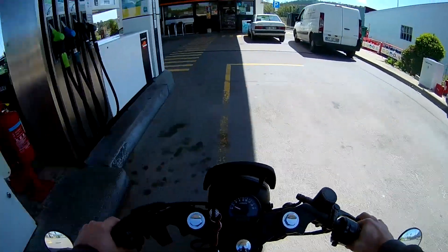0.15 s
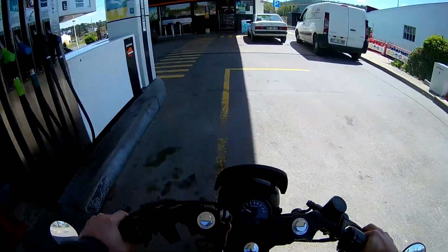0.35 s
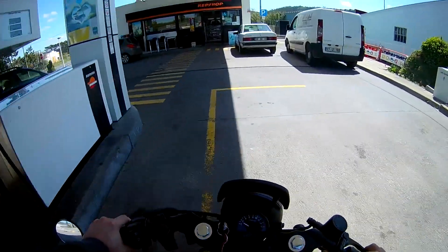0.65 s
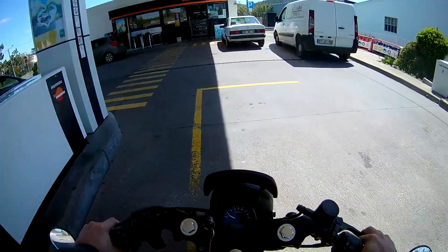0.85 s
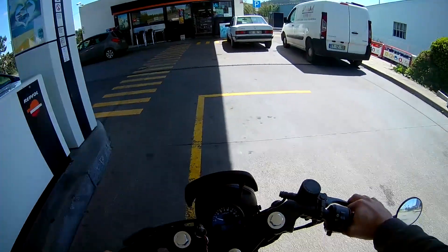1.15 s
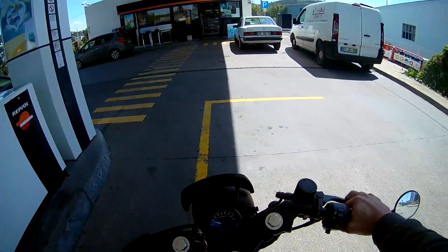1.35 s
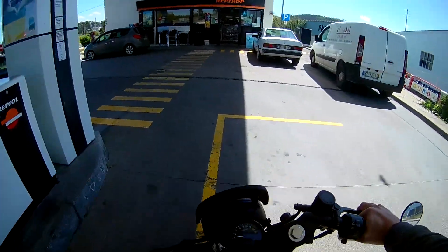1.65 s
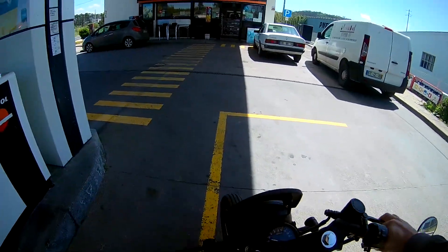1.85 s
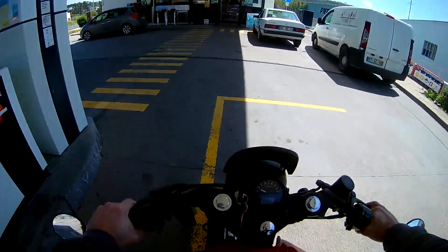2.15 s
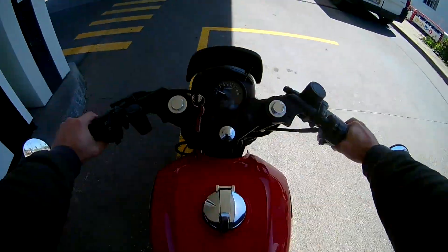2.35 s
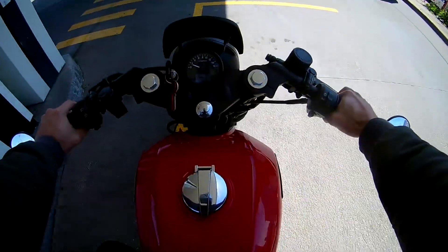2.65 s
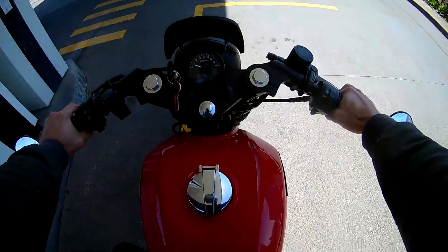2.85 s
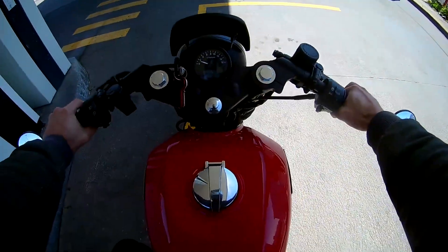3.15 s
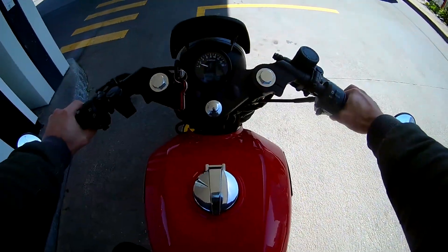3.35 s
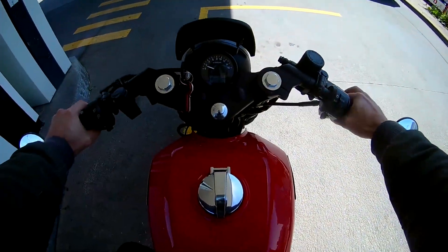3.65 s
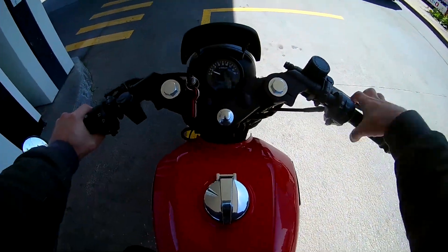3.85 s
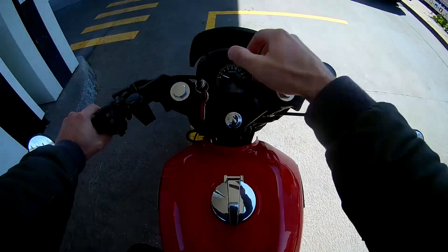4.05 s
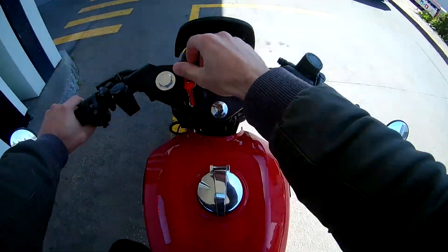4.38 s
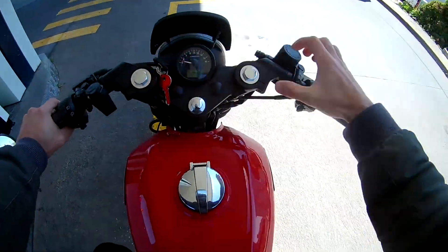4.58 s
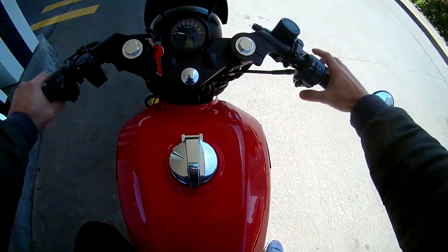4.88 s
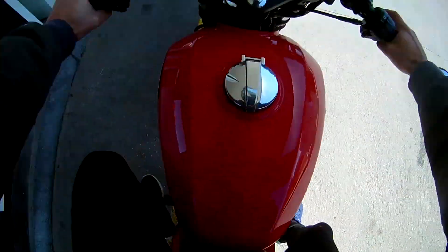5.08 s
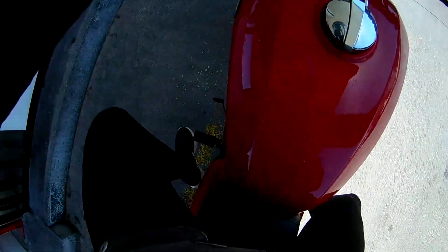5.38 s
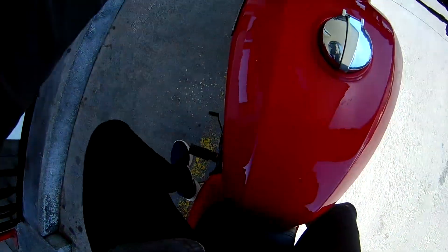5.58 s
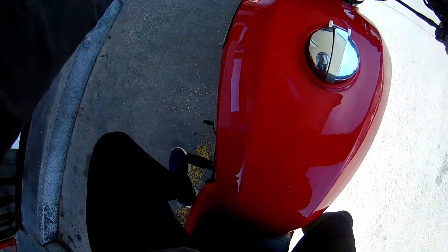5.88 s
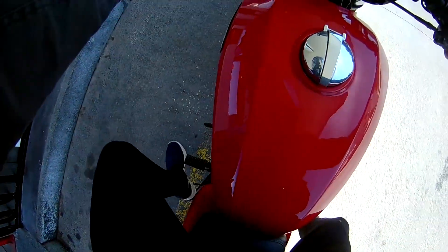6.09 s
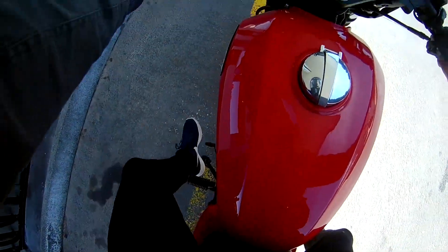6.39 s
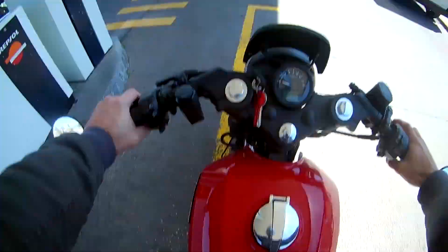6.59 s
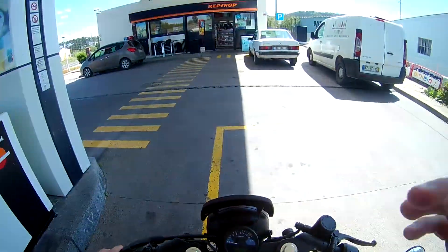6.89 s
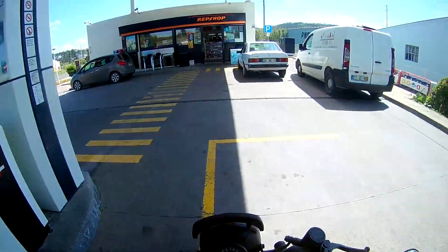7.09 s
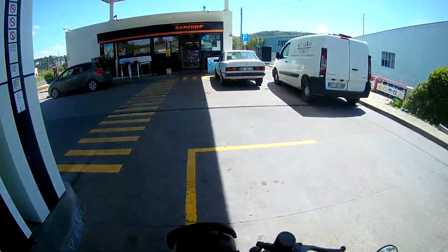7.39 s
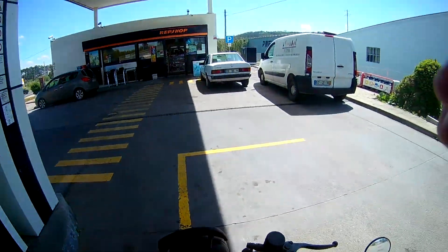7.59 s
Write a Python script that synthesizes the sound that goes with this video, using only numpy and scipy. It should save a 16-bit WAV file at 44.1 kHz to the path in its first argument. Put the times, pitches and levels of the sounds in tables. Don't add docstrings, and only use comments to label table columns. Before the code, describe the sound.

A low, dull motorcycle idle of about thirteen beats a second, with stumbles, sits close to the boxed-in microphone with hollow outdoor traffic behind it. Small metal ticks accompany switching off. Then the case itself takes over: overloaded plastic cracks, dry clatter, stick-slip scraping and little spring chirps, followed by low buffeting, more bumps and a rough fabric rub that stops with the hand letting go.

```python
import sys
import numpy as np
from scipy import signal
from scipy.io import wavfile
from scipy.ndimage import uniform_filter1d

SR = 44100
rng = np.random.default_rng(int(sys.argv[2]) if len(sys.argv) > 2 else 0)


def invert_db(x):
    u = np.asarray(x, float) / 20
    return 10 ** u


def file_out(sig):
    cols = np.atleast_2d(sig).T
    lim = np.clip(cols, -1, 1)
    pcm = np.round(lim * 32767).astype(np.int16)
    wavfile.write(sys.argv[1], SR, pcm)


N = 340893


def evened(x):
    return x / np.sqrt(np.mean(x ** 2) + 1e-20)


def curve(rows, t):
    s, *columns = np.transpose(rows)
    return [np.interp(t, s, c) for c in columns]


def add(mix, s, sound):
    part = mix[max(round(s * SR), 0):][:len(sound)]
    part += sound[:len(part)]


def decay(length, time_constant_s):
    return np.exp(-np.arange(length) / SR / time_constant_s)


def band(x, low_hz, high_hz):
    return signal.sosfilt(signal.butter(4, [low_hz, high_hz], "bandpass", fs=SR, output="sos"), x)


def ring(modes, length_s, factor=1.0, shake_db=0., phase=0., rise_s=0.00029):
    t = np.arange(round(length_s * SR)) / SR
    hz, db, t60_s = np.transpose(modes)[:, :, None]
    waves = np.sin(2 * np.pi * hz * t + np.reshape(phase, (-1, 1)))
    level_db = db + np.reshape(shake_db, (-1, 1)) - 60 * t / (t60_s * factor)
    rise = (1 - np.exp(-t / rise_s)) ** 2
    return rise * (invert_db(level_db) * waves).sum(0)


def noise(spectrum, patchy_db, size=1024):
    frames, hz = 4 * N // size + 5, np.fft.rfftfreq(size, 1 / SR)
    a, b, patches = rng.standard_normal((frames, len(hz), 3)).T
    patches = uniform_filter1d(patches, size=8, axis=0)
    patches = evened(uniform_filter1d(patches, size=10, axis=1))
    f, db = np.transpose(spectrum)
    colour_db = np.interp(np.log(hz + 1), np.log(f + 1), db, left=-120, right=-120)
    z = (a + 1j * b) * invert_db(colour_db[:, None] + patchy_db * patches)
    return evened(signal.istft(z, nperseg=size, noverlap=3 * size // 4)[1][:N])


def resonate(x, hz, width_hz):
    turn = np.exp(2j * np.pi * np.cumsum(hz * np.ones(len(x))) / SR)
    r = np.exp(-np.pi * width_hz / SR)
    return evened((turn * signal.lfilter([1 - r], [1, -r], x / turn)).real)


# pitch_hz, density_db [dB per Hz]
YARD_COLOUR = [(90, -48), (150, -12.5), (260, -7.5), (400, -10.5), (580, -12.5), (850, -11), (1050, -6.5),
               (1280, -8.5), (1460, 0), (1750, -8.5), (2050, -15.5), (2350, -26.5), (2900, -32),
               (3600, -27), (4300, -33), (4900, -44), (6500, -48)]
# time_s, level_db
TRAFFIC_LEVEL = [(0.0, -50), (0.99, -48.5), (1.57, -49.5), (2.97, -47), (3.98, -48), (4.65, -51.5),
                 (4.89, -49.5), (5.7, -48.5), (6.42, -50.5), (7.15, -53.5), (7.49, -53.5), (7.73, -38)]
ENGINE_OFF_S, LOW_ON_DB, LOW_OFF_DB = 4.67, 2, -1.5


def yard():
    t = np.arange(N) / SR
    wash = noise(YARD_COLOUR, patchy_db=.9)
    low = signal.sosfilt(signal.butter(2, 600, fs=SR, output="sos"), wash)
    low_db = np.interp(t - ENGINE_OFF_S, [0, .25], [LOW_ON_DB, LOW_OFF_DB])
    return invert_db(curve(TRAFFIC_LEVEL, t)[0]) * (wash + (invert_db(low_db) - 1) * low)


# pitch_hz, level_db, until_s
PUMP = (868, -65.5, 5.2)


def pump_hum():
    hz, db, until_s = PUMP
    tone = evened(band(rng.standard_normal(N), hz - 4, hz + 4))
    return invert_db(db) * tone * np.clip(until_s - np.arange(N) / SR, 0, 1)


# pitch_hz, density_db [dB per Hz]
HISS_COLOUR = [(2650, -12), (4500, -8.5), (8730, -11.5), (9590, -12), (11600, -13), (15100, -8),
               (15700, -9)]


def hiss():
    return invert_db(-74) * noise(HISS_COLOUR, patchy_db=1.5)


# time_s, level_db
BREEZE = [(0, -50), (1, -49), (2.7, -52), (3.2, -53), (4.1, -52), (4.6, -58), (5.2, -51), (5.85, -56),
          (7.73, -56)]
# peak_s, level_db, rise_s [to rise 20 dB], fall_s [to fall 20 dB]
PUSHES = [(1.38, -41, .15, .1), (1.78, -45, .1, .3), (2.33, -47, .2, .3), (2.52, -45, .2, .1),
          (5.29, -37, .08, .3), (5.42, -29, .22, .08), (5.54, -30, .07, .12), (5.67, -38, .1, .15),
          (6.03, -50, .2, .2), (6.396, -43, .06, .06), (6.62, -46, .04, .1), (6.72, -48, .2, .25),
          (7.142, -28, .055, .09), (7.33, -20.5, .055, .07), (7.392, -19, .065, .095),
          (7.478, -19.5, .055, .32)]
LET_GO_S, LET_GO_DB_PER_S = 7.67, 436


def pushing(t):
    s, db, rise_s, fall_s = np.transpose(PUSHES)[:, :, None]
    shoves_db = db - 20 * np.where(t < s, (s - t) / rise_s, (t - s) / fall_s)
    shove_db = shoves_db.max(0) - LET_GO_DB_PER_S * np.maximum(t - LET_GO_S, 0)
    return np.maximum(curve(BREEZE, t)[0], shove_db)


# pitch_hz, density_db [dB per Hz]
ROCKING_COLOUR = [(12, -30), (20, -14.5), (42, 0.5), (75, -10.5), (113, -14.5), (173, -22.5), (250, -20),
                  (320, -43.5), (550, -120)]
# pitch_hz, density_db [dB per Hz]
SWAY_COLOUR = [(15, -27.5), (30, -16.5), (55, -3), (80, -8), (110, -25.5), (250, -29), (400, -60)]
AIR_TOP_DB = -47


def rumble():
    t = np.arange(N) / SR
    push_db = np.interp(t, t[::64], pushing(t[::64]))
    rocking = noise(ROCKING_COLOUR, patchy_db=3.0, size=4096)
    rocking = rocking / np.sqrt(uniform_filter1d(rocking ** 2, size=30000))
    sway = noise(SWAY_COLOUR, patchy_db=5.0, size=4096)
    sway = sway / np.sqrt(uniform_filter1d(sway ** 2, size=2500))
    excess = np.maximum(invert_db(push_db) - invert_db(AIR_TOP_DB), 0)
    return invert_db(np.minimum(push_db, AIR_TOP_DB)) * rocking + excess * sway


def stick_slip_tones(rows):
    out = np.zeros(N)
    for s, length_s, start_hz, end_hz, db in rows:
        hz = np.linspace(start_hz, end_hz, round(length_s * SR))
        waver = evened(uniform_filter1d(rng.standard_normal(SR), size=300))[:len(hz)]
        phase = 2 * np.pi * np.cumsum(hz * (1 + 0.013 * waver)) / SR
        add(out, s, invert_db(db) * np.sin(phase) * signal.windows.hann(len(hz)))
    return out


# start_s, length_s, start_hz, end_hz, level_db
BRAKE_SQUEAKS = [
    (0.013, 0.108, 607, 703, -46),
    (0.036, 0.051, 740, 760, -49),
    (0.027, .07, 12400, 12450, -71),
    (1.49, .05, 12450, 12400, -74),
]


def brake():
    return stick_slip_tones(BRAKE_SQUEAKS)


# first_beat_s, last_beat_s, first_db, last_db
IDLE_STRETCHES = [(0.074, 0.379, -6.5, -7), (0.535, 0.7607, -9, -6.5), (0.8373, 1.302, -9, -5.5),
                  (1.379, 1.538, -7.5, -7.5), (1.6223, 1.853, -6.5, -9), (2.1013, 2.6447, -5.5, -5.5),
                  (2.723, 2.891, -6.5, -6.5), (3.23, 3.615, -5.5, -6), (3.6996, 4.152, -5.5, -5.5),
                  (4.234, 4.304, -3.5, -8.5)]
BEAT_S = .0775
# time_s, strength_db
LONE_BEATS = [
    (0.45, -16),
    (1.9366, -7),
    (2.0098, -14),
    (2.9663, -28),
    (3.0613, -6.5),
    (3.1404, -11.5),
    (4.413, -14),
    (4.5, -15),
]


def beats():
    rows = list(LONE_BEATS)
    for first_s, last_s, first_db, last_db in IDLE_STRETCHES:
        count = round((last_s - first_s) / BEAT_S) + 1
        rows += zip(np.linspace(first_s, last_s, count), np.linspace(first_db, last_db, count))
    return sorted(rows)


# pitch_hz, level_db, t60_s
PIPE_MODES = [(64.6, -5.5, 0.4), (95.7, 8, 0.15), (177, -3.5, 0.12), (289.5, -1, 0.14), (311.9, 6.5, 0.11),
              (402, -2.5, 0.076), (453.4, 1, 0.075), (520, -10, 0.04)]
PIPE_DB, ECHO_S, ECHO_DB = -40, 0.022, -7.5


def engine():
    out, firings = np.zeros(N), beats()
    start_phase = np.pi / 2 - .0021 * 2 * np.pi * np.array(PIPE_MODES)[:, 0]
    chance = rng.standard_normal((len(firings), len(PIPE_MODES)))
    for (s, db), shake in zip(firings, chance):
        phase = start_phase + 0.47 * shake[::-1]
        beat = ring(PIPE_MODES, 0.27, shake_db=1.8 * shake, phase=phase, rise_s=0.0016)
        add(out, s, invert_db(PIPE_DB + db) * beat)
        add(out, s + ECHO_S, -invert_db(PIPE_DB + db + ECHO_DB) * beat)
    return out


# time_s, peak_db, pitch_hz, width_octaves
METAL_TICKS = [(.5217, -54, 3480, 0.45), (.8565, -56, 3830, .4), (.8789, -53, 3400, 0.63),
               (.9294, -55, 3670, .5), (1.058, -55, 3700, 0.53), (1.314, -47, 2400, 1.65),
               (1.9494, -54, 3620, 0.83), (2.488, -47, 1900, 2.2), (3.02, -47, 3700, 0.54),
               (3.029, -47.5, 3700, 0.68), (4.361, -41.5, 4100, 1), (4.9247, -48, 3930, 0.47),
               (4.9694, -55, 3620, .4), (4.9895, -53, 3600, 0.39), (5.0594, -60, 3900, .5),
               (5.2006, -61, 4000, .7), (5.2444, -47, 4280, 0.78), (5.488, -44, 1520, .6),
               (6.309, -55.5, 3830, 0.48), (6.362, -55, 3950, .7)]


def ticks():
    out, chance = np.zeros(N), rng.standard_normal((len(METAL_TICKS), 900))
    for (s, db, hz, octaves), grit in zip(METAL_TICKS, chance):
        touches = grit * abs(grit) * decay(len(grit), 0.0067)
        jingle = band(touches, hz * 2 ** (-octaves / 2), hz * 2 ** (octaves / 2))
        add(out, s, invert_db(db) * jingle / abs(jingle).max())
    return out


# time_s, loss_db
LATCH_CHOKES = [
    (5.2933, 15.5),
    (5.2999, 15),
    (5.524, 7.5),
    (5.5335, 5.5),
]
CHOKE_S = .002


def choked(s, sound):
    t = s + np.arange(len(sound)) / SR
    loss_db = sum(db * np.clip((t - at) / CHOKE_S, 0, 1) for at, db in LATCH_CHOKES if at > s)
    return sound * invert_db(-loss_db)


HAND_ON_S, HAND_EDGE_HZ, HAND_LOSS_DB, DEAD_HZ = 7.0, 4450, -19, 5050


def through_case(body, treble):
    lid = band(band(treble, 2500, 7300), 2000, 7500)
    lid = signal.lfilter(*signal.iirnotch(DEAD_HZ, 9, SR), lid)
    below_edge = band(band(lid, 3100, HAND_EDGE_HZ), 2000, HAND_EDGE_HZ)
    held = invert_db(HAND_LOSS_DB) * lid + below_edge
    return band(body, 550, 2200) + np.where(np.arange(N) < HAND_ON_S * SR, lid, held)


# pitch_hz, level_db, t60_s
CASE_MODES = [(806, -17, 0.05), (934, -8, 0.017), (1108, -13, 0.046), (1294, -9.5, 0.036),
              (1402.5, -3, 0.029), (1605, -10, 0.04), (1869, -10, 0.042), (1909, -30.5, .035),
              (2912, 3.5, 0.05), (3400, -21, 0.045), (4280, 5, 0.026), (3975, -1.5, 0.051),
              (4680, -3, 0.026), (5620, -8, 0.045), (6135, -9, 0.025), (7040, -9.5, 0.016)]
WALL_MODES = [m for m in CASE_MODES if m[0] < 2400]
LID_MODES = [m for m in CASE_MODES if m[0] >= 2400]
# time_s, peak_db, treble_db, strongest_hz, ring_factor
HARD_BLOWS = [(5.2849, 19.5, -15.5, 1410, 0.77), (5.2956, 15.5, -18.5, 1410, 0.7),
              (5.3035, -10, -7, 1400, 0.54), (5.3065, -4.5, -12.5, 1400, 0.61),
              (5.312, -8, -25, 1526, 0.81), (5.32, -6, -48.5, 1270, 0.53), (5.5153, 22.5, -20, 1407, 0.73),
              (5.5284, -8, -9, 1474, 0.4), (5.643, -14, -20, 1305, 0.59), (5.982, -26, -13, 1850, 0.34),
              (6.067, -23.5, -22.5, 1430, 0.33), (6.124, -27, -19, 1420, 0.6), (7.311, -22, -4, 1590, 0.53),
              (7.3875, -11, -19, 1120, 0.2), (7.458, -14.5, -19.5, 1080, 0.49),
              (7.4714, -6.5, -42, 980, 0.49)]
# time_s, peak_db, treble_db, strongest_hz
LATCH_RATTLES = [(1.313, -47, -30, 1600), (3.029, -44, -30, 1600), (4.925, -33, -30, 1600),
                 (4.99, -36, -30, 1650), (5.378, -30, -10, 1630), (5.489, -45, -30, 1480),
                 (5.5332, -15, -27.5, 1640), (5.829, -35, -28.5, 1470), (5.843, -38, -19.5, 1450),
                 (5.862, -30, -25, 1450), (5.964, -35, -16, 1490), (5.672, -34, -39, 1940),
                 (5.685, -38, -27, 1500), (5.708, -29, -22, 1480), (5.715, -24, -22, 1440),
                 (5.727, -20.5, -16, 1430), (5.734, -17, -37, 1480), (5.748, -20, -28, 1640),
                 (5.761, -27, -24, 1520), (5.768, -29, -21, 1480), (5.853, -33.5, -24, 1430),
                 (5.927, -27, -17, 1630), (5.938, -33, -15, 1354), (5.951, -40, -12, 1430),
                 (6.007, -37.5, -18, 1920), (6.025, -34.5, -24, 1560), (6.13, -29.5, -18.5, 1420),
                 (6.141, -38, -17, 1395), (6.3635, -34, -24.5, 1420), (7.119, -35, -14, 1576),
                 (7.287, -33, -19, 1670), (7.351, -23, -17, 1940), (7.378, -35, -12, 1940),
                 (7.41, -30, -22, 1620), (7.4968, -22, -20, 1600), (7.52, -18, -20, 1900)]
RATTLE_RING, CONTACT_S, TOP_DB = .7, .0009, 22


def knocks():
    body, treble = np.zeros((2, N))
    hits = sorted(HARD_BLOWS + [(*row, RATTLE_RING) for row in LATCH_RATTLES])
    chance = rng.standard_normal((len(hits), len(CASE_MODES) + 600))
    wall_hz = np.array(WALL_MODES)[:, 0]
    for (s, db, treble_db, hz, factor), luck in zip(hits, chance):
        shake_wall, shake_lid, grit = np.split(luck, [len(WALL_MODES), len(CASE_MODES)])
        spot_db = 9 * np.exp(-(np.log2(wall_hz / hz) / .12) ** 2) + 1.5 * shake_wall
        db = min(db, TOP_DB)
        contact = grit * decay(len(grit), CONTACT_S)
        wall = np.convolve(ring(WALL_MODES, .12, factor, spot_db), np.r_[1, .12 * contact])
        lid = np.convolve(ring(LID_MODES, .08, .5 * factor, 1.5 * shake_lid), np.r_[2, contact])
        add(body, s, choked(s, invert_db(db) * wall / abs(wall).max()))
        add(treble, s, choked(s, invert_db(db + treble_db + 4.5) * lid / abs(lid).max()))
    return through_case(body, treble)


# pitch_factor, level_db
MOUNT_MODES = [(.5, -2), (0.999, 3), (1.6, -5), (2.9, -4.5)]
# time_s, peak_db, pitch_hz, t60_s
BUMPS = [(2.488, -29, 310, 0.027), (2.972, -43, 190, .08), (5.06, -37, 357, 0.031),
         (5.108, -34.5, 318, 0.014), (5.146, -36.5, 302, 0.019), (5.199, -33.5, 310, 0.021),
         (5.245, -32.5, 197, 0.075), (5.287, -20, 189, 0.13), (5.404, -14.5, 177, 0.0087),
         (5.518, -8.5, 224.4, 0.025), (5.54, -30, 640, 0.093), (5.646, -23, 405, 0.054),
         (5.654, -31, 300, 0.03), (5.73, -32, 730, .07), (5.747, -32, 740, 0.053), (5.987, -30, 712, 0.046),
         (6.128, -31.5, 714, 0.043), (6.363, -42.5, 306, 0.043), (7.085, -37.5, 309, 0.041),
         (7.117, -25.5, 205, 0.022), (7.137, -32, 150.4, .04), (7.236, -39, 307, 0.027),
         (7.2864, -34, 250, 0.025), (7.3107, 0, 284, 0.0092), (7.389, -8, 249, 0.018),
         (7.4572, -16, 302, 0.05), (7.4713, -4, 385, 0.021), (7.478, -16, 240, 0.061),
         (7.495, -19, 200, 0.053)]


def thuds():
    out = np.zeros(N)
    for s, db, hz, t60_s in BUMPS:
        modes = [(hz * k, mode_db, t60_s / np.sqrt(k)) for k, mode_db in MOUNT_MODES]
        bump = -ring(modes, 0.13, rise_s=0.00036)
        add(out, s, invert_db(db) * bump / abs(bump).max())
    return band(out, 90, 1700)


# pitch_hz, level_db, t60_s
BRACKET_MODES = [(245, -36.5, .14), (460, -31.5, 0.052), (647, -31.5, 0.12), (801, -23.5, 0.12)]
# time_s, level_db
BRACKET_HITS = [(5.287, -15), (5.319, 2), (5.4, -11), (5.53, -5.5), (5.646, -12), (5.728, -17),
                (5.746, -12), (5.905, -17), (5.922, -21), (5.986, -9), (6.02, -21.5), (6.128, -10),
                (7.311, -14)]


def bracket():
    out = np.zeros(N)
    for s, db in BRACKET_HITS:
        add(out, s, invert_db(db) * ring(BRACKET_MODES, .15, rise_s=.002))
    return out


# start_s, hardest_s, end_s, pressure_db, treble_db
SCRAPE_STROKES = [(5.3, 5.327, 5.34, -26.5, -11.5), (5.337, 5.367, 5.42, -35, -6),
                  (5.38, 5.399, 5.409, -13.5, -8.5), (5.7, 5.738, 5.765, -23, -26),
                  (5.76, 5.782, 5.795, -29.5, -26), (5.675, 5.675, 5.7, -32.5, -23),
                  (5.823, 5.852, 5.878, -48, -22), (5.9, 5.932, 5.98, -35, -20),
                  (5.978, 6.027, 6.058, -43, -18.5)]
ENDS_DB, GRITTY_ENDS, GRITTY_HARD, GRAINS_PER_S = -21.5, 0.5, 0.31, 700


def scrapes():
    body, treble = np.zeros((2, N))
    smooth = rng.standard_normal(N)
    grains = evened(rng.standard_normal(N) * (rng.random(N) < GRAINS_PER_S / SR))
    for start_s, hard_s, end_s, db, treble_db in SCRAPE_STROKES:
        span = slice(round(start_s * SR), round(end_s * SR))
        light = np.interp(np.arange(N)[span] / SR, [start_s, hard_s, end_s], [1, 0, 1])
        gritty = GRITTY_HARD + (GRITTY_ENDS - GRITTY_HARD) * light
        drive = np.sqrt(1 - gritty) * smooth[span] + np.sqrt(gritty) * grains[span]
        drive *= invert_db(db + ENDS_DB * light) * signal.windows.tukey(len(light), .12)
        body[span] += drive
        treble[span] += drive * invert_db(treble_db)
    wall = ring(WALL_MODES, .05, factor=.9)
    lid = ring(LID_MODES, .05, factor=.17)
    body = signal.oaconvolve(body, wall / np.linalg.norm(wall))[:N]
    treble = signal.oaconvolve(treble, lid / np.linalg.norm(lid))[:N]
    return through_case(body, treble)


# [pitch_hz, level_db, t60_s]
SNAPPING_PARTS = [
    ((5.3063, -12, -14, .0004), [(2864, 0, .015), (3456, -4, .014), (5577, -9, .008)]),
    ((5.5286, -1, -22, .0004), [(1416, 0, .022), (1750, -10, .016), (2880, -31, .045), (4000, -28, .02), (5600, -30, .016)]),
    ((5.643, .5, -27, .0005), [(468, -30, .05), (797, -18, .035), (1230, -6, .013), (1450, 0, .016), (1650, -14, .018), (2000, -17, .018), (2860, -34, .02), (3400, -34, .012), (3962, -31, .02), (5437, -41, .014), (6202, -38, .008)]),
    ((5.982, -14, -19, .0003), [(790, -15, .035), (1080, -22, .035), (1900, 0, .016), (1600, -7, .014), (2476, -22, .012), (3975, -17, .02), (4600, -23, .01)]),
    ((6.1238, -16, -27, .001), [(1405, 0, .012), (2864, -31, .012), (4300, -25, .009), (5550, -30, .01)]),
    ((7.3113, -11, -20, .0004), [(1637, 0, .015), (1100, -9, .025), (2159, -14, .018), (3600, -17, .012), (4285, -26, .02)]),
]
SNAP_TICK_S = .0013


def snaps():
    out, chance = np.zeros(N), rng.standard_normal((len(SNAPPING_PARTS), 500))
    for ((s, db, tick_db, rise_s), modes), grit in zip(SNAPPING_PARTS, chance):
        sound = ring(modes, .06, rise_s=rise_s)
        sound = sound / abs(sound).max()
        tick = band(grit * decay(len(grit), SNAP_TICK_S), 2300, 5600)
        add(sound, 0, invert_db(tick_db) * tick / abs(tick).max())
        add(out, s, choked(s, invert_db(db) * sound))
    return out


# start_s, length_s, start_hz,
# end_hz, level_db
LATCH_TONES = [(5.486, .012, 1480, 1450, -44), (5.74, 0.015, 1750, 1700, -29.5),
               (5.779, .013, 1516, 1500, -31), (5.827, .009, 1470, 1450, -29),
               (5.84, 0.014, 1450, 1450, -34.5), (5.85, 0.0069, 1426, 1420, -27.5),
               (5.856, 0.0065, 1410, 1430, -28.5), (5.861, 0.0076, 1460, 1440, -30),
               (5.931, 0.0094, 1400, 1350, -37), (5.949, 0.012, 1433, 1430, -32),
               (6.023, .009, 1500, 1500, -36), (6.138, .008, 1400, 1395, -27),
               (5.771, .011, 1500, 1480, -32), (5.715, .009, 2850, 2800, -44),
               (5.726, .017, 2870, 2850, -42), (5.747, .009, 2850, 2800, -45),
               (5.761, .011, 4050, 4150, -51)]


def latch_spring():
    return stick_slip_tones(LATCH_TONES)


# time_s, resonance_hz, level_db
CUFF_GAP = [(7.49, 1500, -44), (7.497, 1600, -30), (7.512, 1700, -29), (7.524, 2100, -23),
            (7.538, 1800, -20), (7.55, 1550, -30), (7.57, 1910, -41), (7.6, 1600, -34)]
GAP_WIDTH_HZ, GAP_DB = 260, -4


def cuff_gap(catch):
    t, out = np.arange(N) / SR, np.zeros(N)
    cuff = (t > CUFF_GAP[0][0]) & (t < CUFF_GAP[-1][0])
    hz, db = curve(CUFF_GAP, t[cuff])
    gap = resonate(rng.standard_normal(cuff.sum()) * catch[cuff], hz, GAP_WIDTH_HZ)
    gap = band(band(gap, 900, 2600), 900, 2600)
    out[cuff] = invert_db(db + GAP_DB) * gap * signal.windows.tukey(cuff.sum(), .2)
    return out


# pitch_hz, density_db [dB per Hz]
CLOTH_COLOUR = [(300, -4.5), (880, -13), (1110, -1.5), (1320, -9.5), (1620, 1), (2100, -7), (2650, -16.5),
                (3300, -10), (3950, -9), (4350, -13), (4480, -17), (5100, -19), (5600, -26), (6500, -24),
                (7200, -34), (7900, -55.5), (9000, -33), (11500, -51)]
# pitch_hz, width_hz, level_db [over the pressure]
PALM_WALL = [(1130, 90, -6), (1600, 130, -0.5), (1940, 100, -5.5), (2205, 90, -14)]
# time_s, pressure_db, brightness_db [speed]
GLOVE_STROKES = [
    [(7.118, -43.5, -3), (7.132, -36, -12), (7.142, -54, -3), (7.15, -68, -6.5)],
    [(7.287, -35, -8), (7.295, -45.5, -19.5), (7.31, -46, -13.5)],
    [(7.313, -19, -9), (7.328, -33.5, -11), (7.345, -34.5, -22.5), (7.36, -34.5, -13), (7.387, -38.5, -7)],
    [(7.389, -23.5, -22), (7.41, -43.5, -8), (7.455, -64, -21)],
    [(7.4715, -10, -19.5), (7.488, -43.5, -37), (7.5, -34, -18), (7.514, -29.5, -8.5), (7.536, -25.5, -8),
     (7.59, -35.5, -8), (7.6675, -42.5, -8.5)],
    [(7.6675, -41.5, -23), (7.7, -50.5, -28), (7.73, -60, -13)],
]
DRAG_DB, DRAG_SLOPE, FIZZ_DB, PALM_FIZZ_DB = -39, 0.92, -28, -13.5
CUFF_FROM_S, PALM_UPPER_DB, CUFF_UPPER_DB, PALM_OFF_S, PALM_DRY = 7.5, -6, 3, 7.46, .6


def cloth():
    t, rub = np.arange(N) / SR, noise(CLOTH_COLOUR, patchy_db=2.0, size=512)
    catch = invert_db(2.5 * evened(uniform_filter1d(rng.standard_normal(N), size=120)))
    edges_hz = [(700, 2400), (130, 700), (2400, HAND_EDGE_HZ), (8300, 11500), (HAND_EDGE_HZ, 7600)]
    registers = [evened(band(band(rub, *edge) * catch, *edge)) for edge in edges_hz]
    wall = np.zeros(N)
    for hz, width_hz, db in PALM_WALL:
        once = resonate(rng.standard_normal(N) * catch, hz, width_hz)
        wall += invert_db(db) * resonate(once, hz, width_hz)
    out = cuff_gap(catch)
    for rows in GLOVE_STROKES:
        span = (t >= rows[0][0]) & (t < rows[-1][0])
        press_db, speed_db = curve(rows, t[span])
        palm = t[span] < CUFF_FROM_S
        bright_db = press_db + speed_db
        drag_db = DRAG_DB + DRAG_SLOPE * (press_db + 36)
        fizz_db = bright_db + FIZZ_DB + PALM_FIZZ_DB * palm
        upper_db = bright_db - 11.5 + np.where(palm, PALM_UPPER_DB, CUFF_UPPER_DB)
        levels_db = [press_db, drag_db, bright_db, fizz_db, upper_db]
        stroke = sum(invert_db(db) * r[span] for db, r in zip(levels_db, registers))
        singing = invert_db(press_db) * (wall - PALM_DRY * registers[0])[span]
        stroke = np.where(t[span] < PALM_OFF_S, stroke + singing, stroke)
        out[span] += stroke * signal.windows.tukey(span.sum(), 60 / span.sum())
    return out


def gain_pop():
    out = np.zeros(N)
    out[round(7.6675 * SR)] = invert_db(-34)
    return out


def scene():
    outside = yard() + pump_hum() + hiss() + rumble()
    motorcycle = brake() + engine() + ticks()
    struck = knocks() + thuds() + bracket() + snaps() + latch_spring()
    handled = scrapes() + cloth() + gain_pop()
    return (outside + motorcycle + struck + handled)[None]


def top_cut(x):
    return signal.sosfilt(signal.butter(12, 15820, fs=SR, output="sos"), x)


def record(dry):
    flat_topped = np.clip(dry, -1, 1)
    slowed = signal.sosfilt(signal.butter(1, 12000, fs=SR, output="sos"), flat_topped)
    near_clipping = uniform_filter1d(1. * (abs(dry) >= 1), size=200) > 0
    mix = np.where(near_clipping, slowed, flat_topped)
    return top_cut(mix)


dry = scene()
out = record(dry)
file_out(out)
```